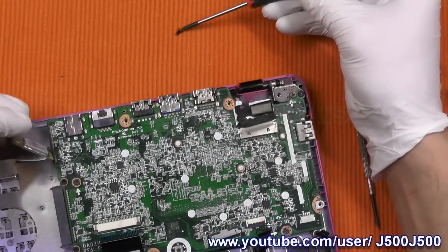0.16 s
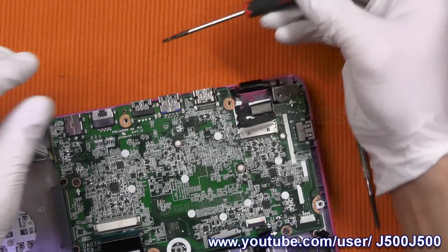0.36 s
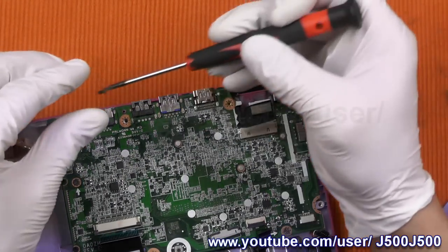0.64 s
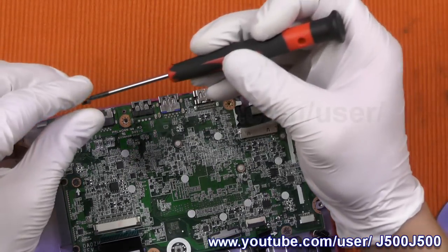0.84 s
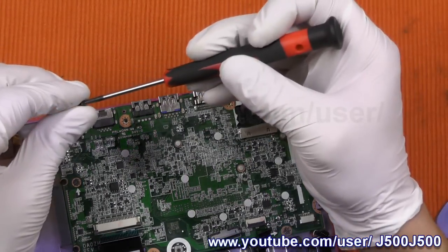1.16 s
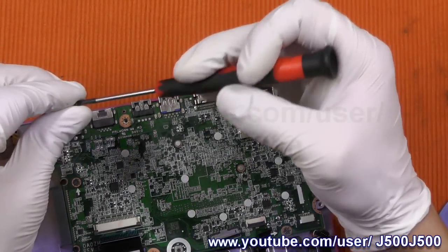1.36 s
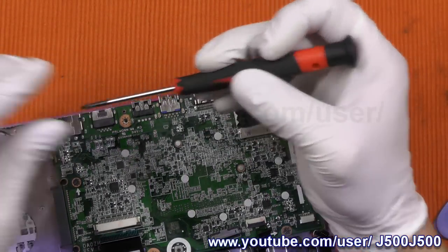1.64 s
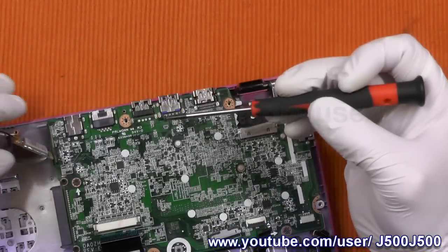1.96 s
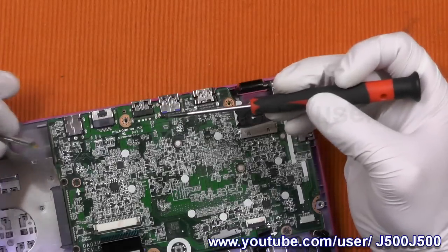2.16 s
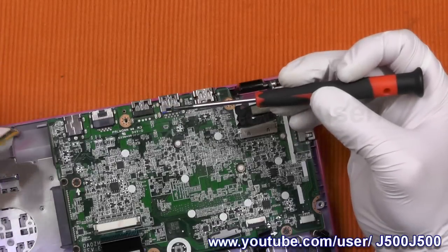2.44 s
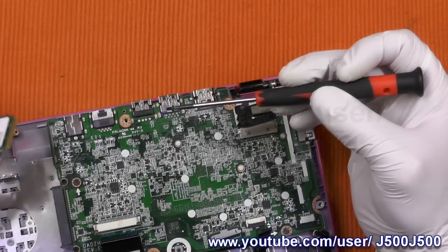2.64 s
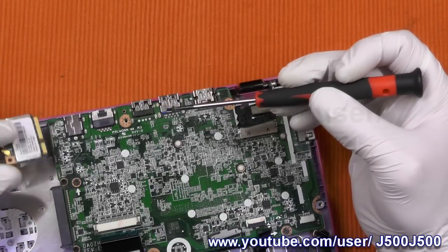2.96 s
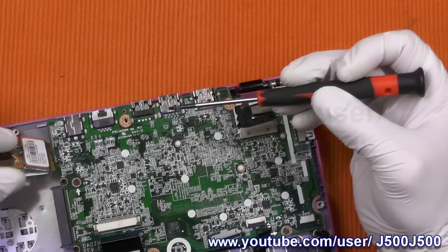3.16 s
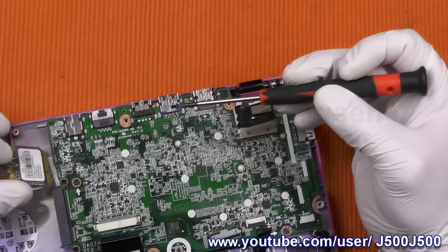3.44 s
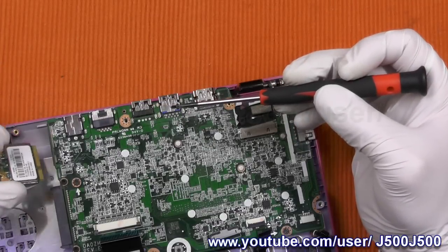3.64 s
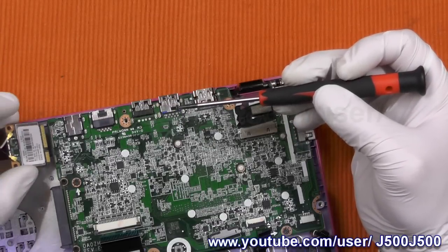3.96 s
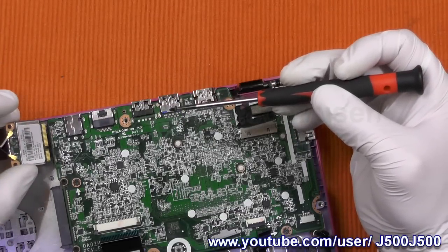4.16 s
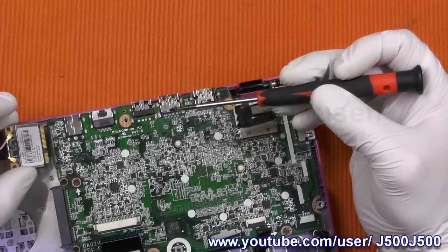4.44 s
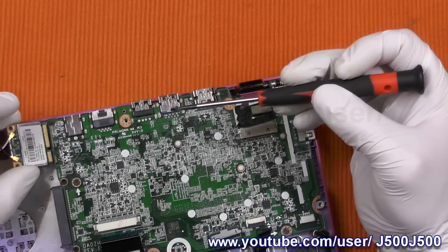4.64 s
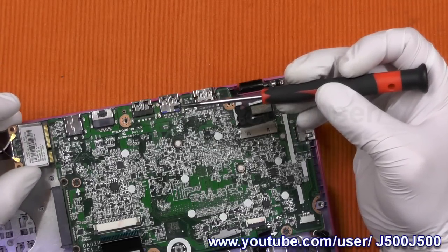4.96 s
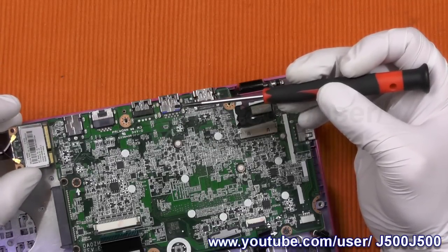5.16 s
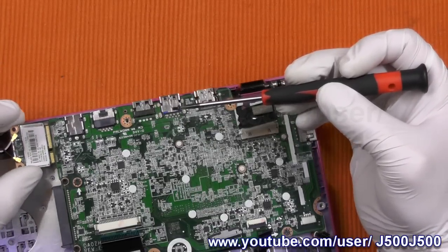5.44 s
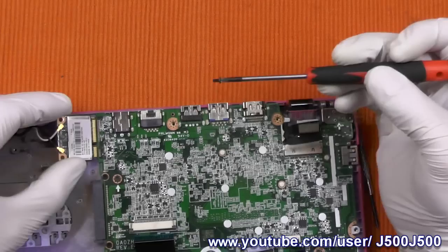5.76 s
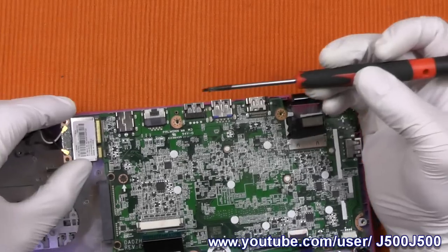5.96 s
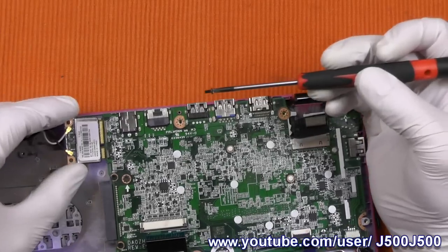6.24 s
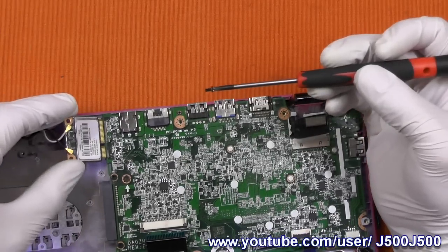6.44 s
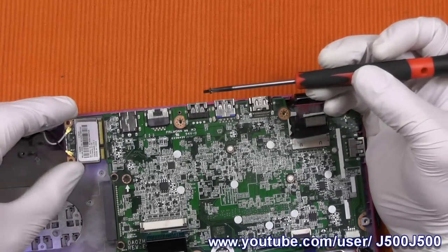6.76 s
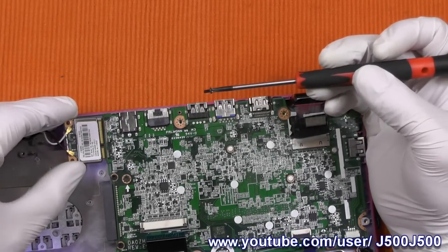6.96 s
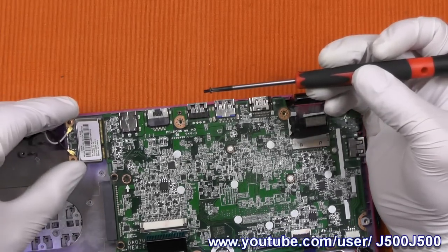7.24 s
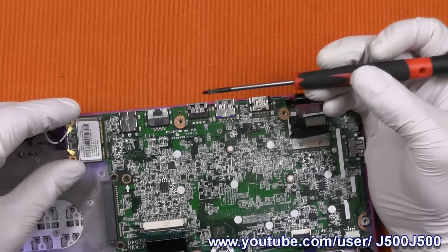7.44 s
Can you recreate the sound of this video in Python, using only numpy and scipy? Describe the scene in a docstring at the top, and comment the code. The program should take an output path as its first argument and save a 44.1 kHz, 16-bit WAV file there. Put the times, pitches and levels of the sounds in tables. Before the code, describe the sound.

A laptop slides and thuds on a table between sharp plastic knocks, short scrapes and metallic snaps, over faint hiss.

```python
"""A gloved hand fits a card into an open laptop on a rubber mat, close by in a small dry room.
Over faint hiss, whirr and rumble, fingers rustle, the plastic case rings from a knock, the laptop
slides with a rubbing hiss and the table thuds. Small metal parts tick between more slides and thuds.
Just after 3 s comes the loudest knock; the card's edge sticks and slips along the case and metal snaps.
From about 5 s the laptop slides again, and card, fingers and screwdriver give a few lighter knocks."""
import sys
import numpy as np
from scipy import signal
from scipy.fft import rfft, irfft, next_fast_len
from scipy.io import wavfile

SR = 44100
rng = np.random.default_rng(int(sys.argv[2]) if len(sys.argv) > 2 else 0)


def transcribe(signal):
    """Save signal, clipped to [-1, 1], as a 16-bit WAV file at the path in sys.argv[1]."""
    frames = np.atleast_2d(signal).T
    limited = np.clip(frames, -1, 1)
    pcm = np.round(limited * 32767).astype(np.int16)
    wavfile.write(sys.argv[1], SR, pcm)


N = 335601
TIME = np.arange(N) / SR
TOUCH_TIME = np.arange(-SR // 50, SR // 5) / SR   # seconds around one touch, which lands at 0


def from_db(db):
    """Turn decibels into a number to multiply by."""
    return 10 ** (np.asarray(db) / 20)

def rms_one(x):
    """Scale a sound so that its average strength (rms) is 1."""
    return x / np.sqrt(np.mean(x ** 2) + 1e-20)

def level(rows):
    """Gain that follows a list of (t/s, level/dB) points."""
    return from_db(np.interp(TIME, *np.transpose(rows)))

def coloured(x, points):
    """Turn low and high pitches up or down along (f/Hz, level/dB) points."""
    hz, db = np.transpose(points)
    size = next_fast_len(N)
    bins_hz = np.maximum(np.arange(size // 2 + 1) * SR / size, 1)
    gain = from_db(np.interp(np.log(bins_hz), np.log(hz), db))
    return irfft(rfft(x, size) * gain, size)[:N]

def band(x, low_hz, high_hz, order=3):
    """Keep the pitches between two limits."""
    sos = signal.butter(order, [low_hz, min(high_hz, .48 * SR)], "band", fs=SR, output="sos")
    return signal.sosfilt(sos, x + 1e-18)

def resonate(x, tones):
    """Ring at each (f/Hz, width/Hz, level/dB) tone, every other one flipped; narrow ones ring longer."""
    out = 0
    for k, (hz, width, db) in enumerate(tones):
        r = np.exp(-np.pi * width / SR)
        poles = [1, -2 * r * np.cos(2 * np.pi * hz / SR), r * r]
        ring = signal.lfilter([1, 0, -1], poles, x + 1e-18)
        out = out + (-1) ** k * from_db(db) * (1 - r * r) / 2 * ring
    return out

def add(track, sound, start_s):
    """Mix a short sound into the track."""
    at = max(round(start_s * SR), 0)
    track[at:at + len(sound)] += sound[:N - at]

def grains(count, spread_db):
    """Gritty noise: tiny slips of uneven size."""
    noise = rng.standard_normal(count)
    sizes = from_db(spread_db * np.clip(rng.standard_normal(count), -2, 2))
    return rms_one(noise * sizes)

def stroke(start_s, held_s, db, rise_s, fall_s):
    """Gain of a hand movement: swell until start_s, hold, fade. Rise and fall are times for 20 dB."""
    away = np.maximum(start_s - TIME, 0) / rise_s + np.maximum(TIME - start_s - held_s, 0) / fall_s
    return from_db(db - 20 * np.minimum(away, 10))

def contact(chatter_s, graze_s, snap, spread_db):
    """Force of one touch: the surfaces graze, snap home, then chatter to rest."""
    swell = np.exp(-np.abs(TOUCH_TIME) / np.where(TOUCH_TIME < 0, graze_s, chatter_s))
    swell = swell * (TOUCH_TIME > -2.5 * graze_s)
    force = grains(len(swell), spread_db) * swell
    spectrum = rfft(force / np.linalg.norm(force) + snap * (TOUCH_TIME == 0))
    evened = spectrum / np.hypot(np.abs(spectrum), .7)   # a hard touch feeds all pitches about alike
    return irfft(evened, len(swell)) * swell ** 0.067

def tilted(colour_db, hardness, pivot_hz, edges):
    """Level of each pitch band: a harder touch has more above pivot_hz and less below."""
    centres = np.sqrt(np.multiply(edges[:-1], edges[1:]))
    return np.array(colour_db) + hardness * np.log2(centres / pivot_hz)

def voiced(ring, levels_db, edges):
    """Set how strong each pitch band is in the first 24 ms of a touch."""
    early = (TOUCH_TIME > -.004) & (TOUCH_TIME < .02)
    parts = [band(ring, low, high) for low, high in zip(edges, edges[1:])]
    return sum(from_db(db) * part / np.std(part[early]) for db, part in zip(levels_db, parts))


# Tone colour of the background hiss: f/Hz, level/dB
HISS_COLOUR = [(150, -6.5), (300, 1.5), (480, 4.5), (650, -1), (850, -9), (1400, -6.5), (2200, -14),
               (3500, -6), (5000, -15), (8700, -21), (9300, -9.5), (15500, -10)]

def hiss():
    """A soft, steady background noise."""
    return from_db(-64.5) * rms_one(coloured(rng.standard_normal(N), HISS_COLOUR))

# Tones in the whirr: f/Hz, width/Hz, level/dB
WHIRR_TONES = [(1104, 200, -8), (1295, 94, -2), (1534, 67, -2.5), (1905, 48, 1), (2650, 60, -2.5),
               (3100, 600, -14), (3660, 200, -3), (4650, 65, -12)]
# How the whirr swells and fades: t/s, relative level/dB
WHIRR_LEVELS = [(0.0, -75), (0.99, -80.5), (1.61, -76.5), (3.43, -76.5), (3.87, -78.5), (4.95, -89),
                (5.61, -78), (5.82, -72), (7.6, -77.5)]

def whirr(gain_db=8):
    """Narrow bands of noise sing faintly and waver."""
    return from_db(gain_db) * level(WHIRR_LEVELS) * rms_one(resonate(rng.standard_normal(N), WHIRR_TONES))

# How the rumble swells and fades: t/s, relative level/dB
RUMBLE_LEVELS = [(0.0, -70.5), (1.25, -73.5), (2.16, -66.5), (2.41, -72), (3.51, -67.5), (4.78, -76),
                 (5.14, -70), (7.22, -66), (7.6, -75)]
# Tone colour of the rumble: f/Hz, level/dB
RUMBLE_COLOUR = [(20, -15.5), (45, -5), (95, 1.5), (140, -4.5), (220, -9.5), (400, -34)]

def rumble(gain_db=2):
    """Handling the laptop makes a deep noise."""
    noise = rms_one(coloured(rng.standard_normal(N), RUMBLE_COLOUR))
    return from_db(gain_db) * level(RUMBLE_LEVELS) * noise

# Ringing tones of the case and its circuit board: f/Hz, width/Hz, level/dB
CASE_TONES = [(96, 22, -1.5), (275, 89, -1.5), (410, 110, -5), (653, 60, 1), (944, 55, -1.5),
              (1058, 62, -2.5), (1353, 95, 0.5), (1546, 65, 4), (1760, 99, -6.5), (2400, 29, -11),
              (2582, 110, -5), (2960, 60, 2), (3340, 170, -6), (3930, 56, -1), (3980, 100, -1.5),
              (4605, 65, -1.5), (4904, 140, -8.5), (5730, 130, -12.5), (6440, 90, -16), (6745, 70, -10.5),
              (7200, 90, -9), (7540, 60, -6)]

def case(force, crack_db):
    """The plastic case rings; some of the force is heard directly as a dry crack."""
    crack = band(force, 1400, 9500, order=2)
    return resonate(force, CASE_TONES) + from_db(crack_db) * crack

# Ringing tones of the card: f/Hz, width/Hz, level/dB
CARD_TONES = [(1460, 150, 0), (1960, 200, 1.5), (3100, 220, -10), (3700, 200, -2), (4150, 130, -2.5),
              (4430, 130, 3.5), (5400, 160, -8.5), (6270, 230, 1), (6890, 90, -2.5), (8250, 330, -4),
              (9460, 200, -8), (12600, 900, -6.5)]

def card(force):
    """The card's metal shield and contacts ring brightly when touched."""
    return resonate(force, CARD_TONES)

# Gloved fingers rubbing the card and its wires: t/s, hold/s, level/dB
RUBS = [(0.01, 0.13, -68), (1.45, 0.24, -68.5), (2.869, .05, -70), (3.5, .35, -68.5), (5.5, 1, -77),
        (7.3, .3, -89)]

def finger_rustle(touches_per_s=220):
    """Many tiny touches, each a burst of slips, blend into a soft rustle with metallic glints."""
    touches = (rng.random(N) < touches_per_s / SR) * rng.uniform(.3, 1, N)
    bursts = signal.lfilter([1], [1, -np.exp(-1 / (0.0054 * SR))], touches + 1e-18)
    slips = bursts * rng.standard_normal(N)
    rustle = case(slips, crack_db=-11.5) + from_db(-4) * card(slips)
    effort = sum(stroke(*rub, rise_s=.9, fall_s=.7) for rub in RUBS)
    return effort * rms_one(band(rustle, 2000, 10000, order=1))

# Borders of the five pitch bands thud, hollow, clack, click and sparkle: f/Hz
BAND_EDGES = [60, 350, 1100, 2500, 7500, 15500]
# Ringing tones of the card against its slot: f/Hz, width/Hz, level/dB
SLOT_TONES = [(1570, 110, -2), (3100, 130, -5), (4600, 81, -3.5)]
# Tone of the hollow shell: f/Hz, width/Hz, level/dB
SHELL_TONE = [(684, 55, 1.5)]
# Knocks on case and board: t/s, level/dB, hardness/(dB per octave), thud level/dB, chatter/s
KNOCKS = [ (0.096, -60, 2.5, -67, 0.011), (0.152, -39, -1, -44.5, 0.0054), (0.193, -69, -1.5, -61, 0.0069),
          (0.204, -65, -4, -77, 0.0061), (2.094, -61, -1.5, -62, 0.0097), (2.108, -63.5, -5.5, -64, 0.0048),
          (2.169, -51.5, -1.5, -58, 0.007), (2.204, -63.5, 5.5, -59, 0.0085),
          (3.2203, -36.5, 0.7, -49, 0.0019), (3.2264, -26.5, 2.5, -48, 0.0039),
          (3.2388, -41.5, 2.5, -41, 0.0023), (3.284, -53, -3.2, -54, 0.0049), (3.576, -61, 3.5, -68, 0.009),
          (4.022, -74.5, -3.5, -78, 0.0026), (4.075, -67.5, -3.5, -66, 0.0082),
          (5.019, -58, -.5, -61, 0.012), (5.096, -72.5, -5.5, -69, .009), (5.115, -83, 1, -77, .004),
          (5.446, -71, 4, -77, 0.0036), (6.022, -60, -0.5, -66, 0.0084), (6.0757, -57.5, 0, -75, 0.0047),
          (6.128, -58, -2, -85, 0.036), (6.274, -44.5, 1.5, -54, 0.0091), (6.59, -58.5, 0, -59, 0.072),
          (6.646, -55, 0.3, -66, 0.017), (6.659, -55.5, 0, -57, 0.013), (6.992, -65.5, -0.2, -74, 0.0047),
          (7.379, -69.5, 3.5, -75.5, .0086)]

def knocks(hand_damping_s=0.032, slot_db=1, heavy_db=-34):
    """Card, fingers and screwdriver strike the case; the hand that holds it soon stops the ring."""
    out = np.zeros(N)
    damping = np.exp(-np.maximum(TOUCH_TIME - .01, 0) / hand_damping_s)
    colour_db = [-2, 1.3, 1.5, -10]   # hollow, clack, click, sparkle
    for s, db, hardness, thud_db, chatter_s in KNOCKS:
        force = contact(chatter_s, graze_s=.0018, snap=0.12, spread_db=10.5)
        rattle = np.clip((chatter_s - .0055) / 0.0074, 0, 1)   # only long chatter shakes the card
        slot = from_db(slot_db) * rattle * resonate(force, SLOT_TONES)
        shell = from_db(db - heavy_db) * resonate(force, SHELL_TONE)   # heavier knocks bend it more
        ring = (case(force, crack_db=-13) - slot - shell) * damping
        levels_db = db + tilted(colour_db, hardness, pivot_hz=2480, edges=BAND_EDGES[1:])
        add(out, voiced(ring, [thud_db, *levels_db], BAND_EDGES), s + TOUCH_TIME[0])
    return out

# Hollow tones of an edge pressed hard: f/Hz, width/Hz, level/dB
RASP_TONES = [(722, 35, 4.5), (1095, 170, 0), (1314, 26, 4.5), (1680, 56, 2)]
# The card's edge dragging along the case: t/s, hold/s, level/dB, pressure (0 to 1)
SCRAPES = [(0.142, 0.007, -49.5, 0.25), (2.26, 0.12, -76, .05), (3.25, .035, -52.5, 0.5),
           (3.32, 0.072, -61, 0.6), (3.417, 0.031, -42, 0.78), (3.515, 0.049, -55.5, 0.46),
           (3.611, 0.022, -62.5, 0)]

def scrapes(slips_per_s=5000):
    """The edge sticks and slips in a fast run of clicks; pressure turns it into a hollow creak."""
    slips = grains(N, spread_db=1) * (rng.random(N) < slips_per_s / SR)
    light = rms_one(band(case(slips, crack_db=-9.5), 2500, 9200, order=2))
    rasp = rms_one(resonate(slips, RASP_TONES))
    out = 0
    for s, held_s, db, pressure in SCRAPES:
        blend = (1 - 0.54 * pressure) * light + 0.92 * pressure * rasp
        out = out + stroke(s, held_s, db, rise_s=.005, fall_s=0.036) * blend
    return out

# Small metal parts touching: t/s, level/dB, hardness/(dB per octave), ring f/Hz, chatter/s
TICKS = [ (0.222, -56, 4, 12100, .0036), (1.348, -65, 1.5, 12400, 0.0044), (1.479, -60, 2, 7240, .0035),
         (2.292, -59.5, 3.5, 7240, .0036), (2.339, -60.5, -0.5, 5510, 0.006),
         (2.39, -58.5, -1, 5600, 0.016), (2.6144, -40, -2, 4600, 0.0058), (2.972, -62.5, 1, 4860, 0.0091),
         (3.125, -72, -2, 6900, .008), (3.15, -67, -3, 7100, .006), (3.341, -68, -2, 6550, .004),
         (3.4703, -48.5, -8, 3000, .0018), (3.512, -57, -6, 4100, .007), (3.6784, -34.5, 1.5, 8340, 0.0028),
         (3.7302, -42.5, 0, 6340, 0.0067), (3.86, -66, -7, 3100, .0053), (6.787, -68.5, -3, 3520, .0036),
         (7.067, -69.5, -5, 3100, .0036)]

def ticks(ring_width_hz=700):
    """Metal meets metal: the card rings, the small part rings briefly, and there is a bright crack."""
    out = np.zeros(N)
    colour_db = [-14.5, 0.2, -0.5]   # clack, click, sparkle
    for s, db, hardness, ring_hz, chatter_s in TICKS:
        force = contact(chatter_s, graze_s=0.0019, snap=0.4, spread_db=1)
        small_part = resonate(force, [(ring_hz, ring_width_hz, 2)])
        ring = card(force) + small_part + from_db(-14) * force
        levels_db = db + tilted(colour_db, hardness, pivot_hz=4300, edges=BAND_EDGES[2:])
        add(out, voiced(ring, levels_db, BAND_EDGES[2:]), s + TOUCH_TIME[0])
    return out

# Tone colour of sliding on rubber: f/Hz, level/dB
SLIDE_COLOUR = [(200, -18.5), (600, -5.5), (800, -11), (1200, -9.5), (1520, -3), (2150, -10.5),
                (3200, -2.5), (4400, -2.5), (6500, -6.5), (8700, -13.5), (10000, -11), (15500, -18.5)]
# Laptop and gloves moving over the mat: t/s, hold/s, relative level/dB, rise/s, fall/s
SLIDES = [(0.37, 0.014, -55.5, 0.073, .38), (1.743, 0.17, -55, 0.096, 0.17),
          (2.17, .22, -63.5, 0.071, 0.037), (5.34, 0.045, -64.5, 0.015, 0.13),
          (5.63, .24, -53.5, 0.11, 0.066), (6.005, 0.12, -55.5, 0.09, 0.054)]

def slides(flutter_db=1, gain_db=2):
    """Rubbing makes a fine hiss that flutters over the ribs of the mat."""
    friction = coloured(grains(N, spread_db=6), SLIDE_COLOUR)
    flutter = from_db(flutter_db * rms_one(band(rng.standard_normal(N), 30, 107, order=2)))
    movement = sum(stroke(*move) for move in SLIDES)
    return from_db(gain_db) * movement * rms_one(friction * flutter)

# Deep tones of the table top: f/Hz, width/Hz, level/dB
TABLE_TONES = [(60, 55, -6.5), (87, 18.6, 3), (134, 53, -12.5)]
# Hands bumping the table: t/s, peak level/dB
BUMPS = [(0.527, -39), (0.586, -51.5), (1.743, -48.5), (2.165, -42.5), (3.229, -41), (3.31, -49),
         (4.95, -57), (5.368, -55), (6.183, -45.5), (6.872, -49), (7.064, -49), (7.166, -58)]

def table_bumps():
    """A soft push sets the table top swinging with a dull thud."""
    out = np.zeros(N)
    push = band(1.0 * (TOUCH_TIME == 0), 30, 220, order=1)
    thud = resonate(push, TABLE_TONES)
    for s, db in BUMPS:
        add(out, from_db(db) * thud / np.abs(thud).max(), s + TOUCH_TIME[0])
    return out

def room(x, first_echo_s=0.0066, low_fade_s=0.11, high_fade_s=0.086):
    """The room's echoes blur into a short tail whose high pitches die first."""
    t = np.arange(SR // 2) / SR
    echoes = rng.standard_normal(len(t)) * (t > first_echo_s)
    lows = band(echoes, 58, 4300, order=1) * from_db(-60 * t / low_fade_s)
    highs = 0.13 * band(echoes, 5500, 15080, order=1) * from_db(-60 * t / high_fade_s)
    tail = lows + highs
    return signal.fftconvolve(x, tail / np.linalg.norm(tail))[:N]

# Stereo width, as the strength of the sides against the middle: f/Hz, level/dB
STEREO_WIDTH = [(60, -19), (200, -13), (400, -16), (1300, -16), (2400, -13), (4400, -14.5), (8000, -15),
                (15000, -20)]

def table_echoes(x, length_s=.012):
    """Quick echoes off the table reach the left and right of the microphone differently."""
    scatter = rfft(rng.standard_normal(int(length_s * SR) // 2 * 2))
    echoes = irfft(scatter / np.abs(scatter))   # equally strong at every pitch
    return coloured(signal.fftconvolve(x, echoes)[:N], STEREO_WIDTH)

def scene():
    """Everything sounds from the middle; only the contacts and a low room noise have some width."""
    contacts = knocks() + ticks() + table_bumps() + scrapes()
    work = contacts + slides() + finger_rustle()
    mid = work + from_db(-16) * room(work) + hiss() + whirr() + rumble()
    echoes = table_echoes(contacts)
    room_noise = from_db(-70.5) * rms_one(band(rng.standard_normal(N), 55, 557, order=2))
    side = echoes + room_noise
    return np.array([mid + side, mid - side])

def record(dry):
    """The very highest pitches, above 15900 Hz, are cut off steeply."""
    return signal.sosfilt(signal.ellip(12, .1, 80, 15900, fs=SR, output="sos"), dry)


dry = scene()
out = record(dry)
transcribe(out)
```